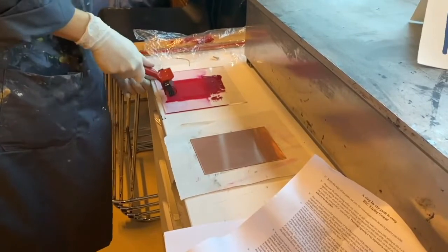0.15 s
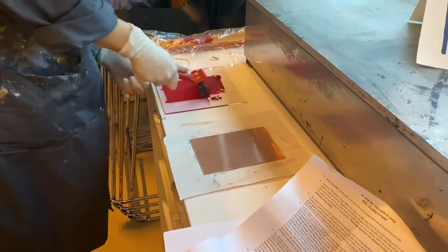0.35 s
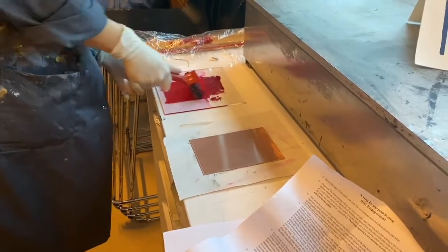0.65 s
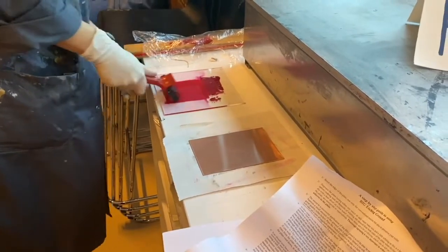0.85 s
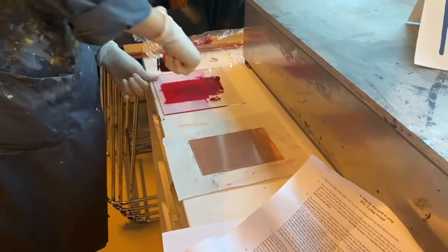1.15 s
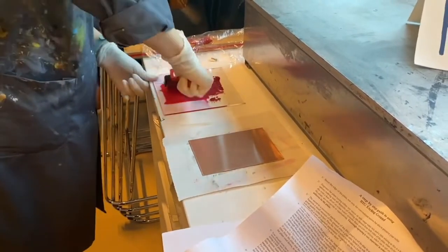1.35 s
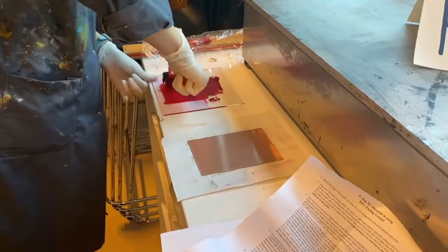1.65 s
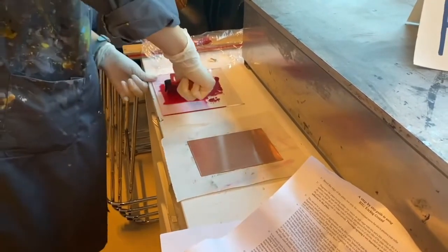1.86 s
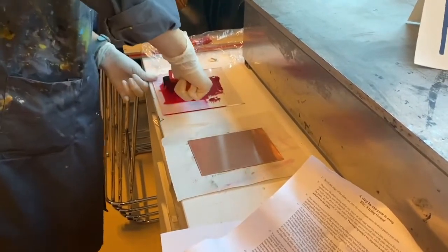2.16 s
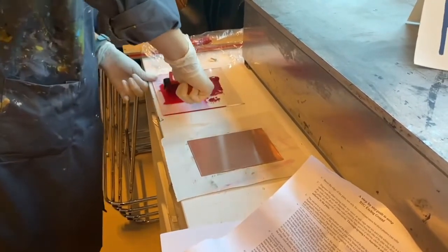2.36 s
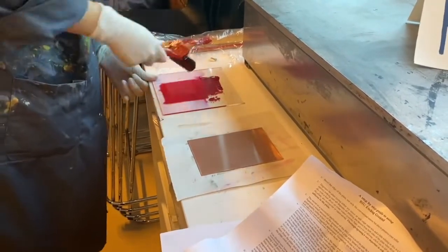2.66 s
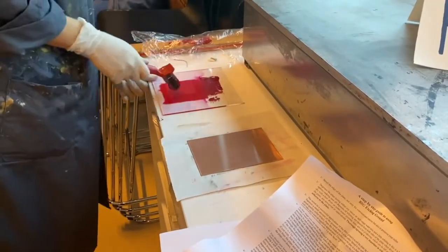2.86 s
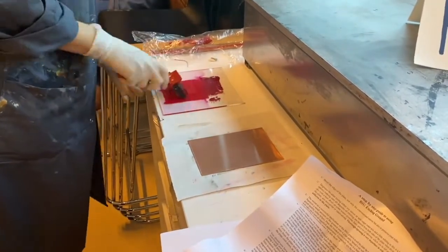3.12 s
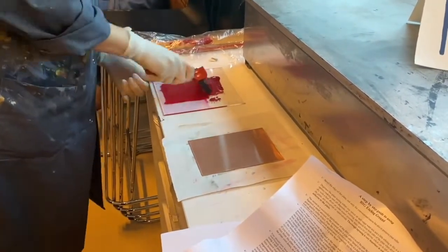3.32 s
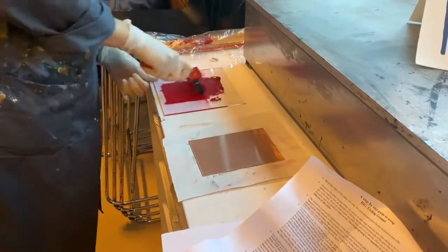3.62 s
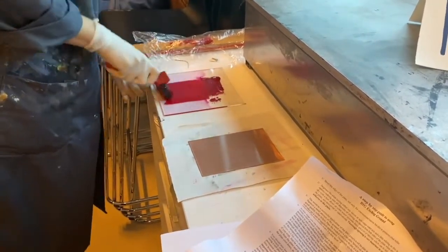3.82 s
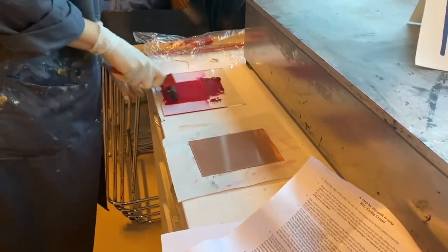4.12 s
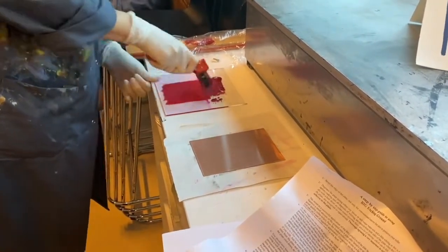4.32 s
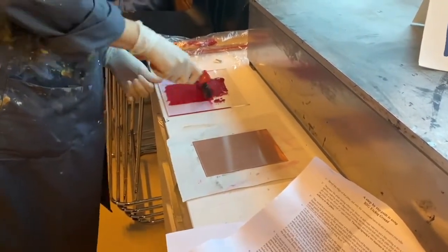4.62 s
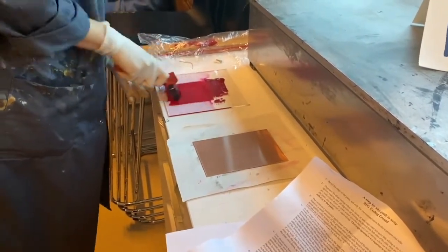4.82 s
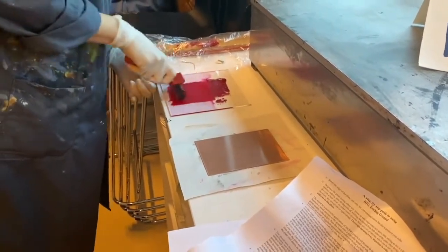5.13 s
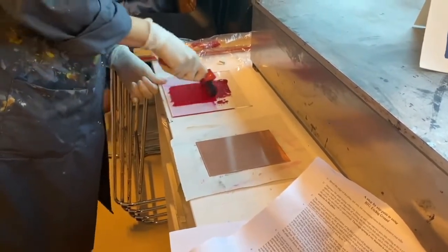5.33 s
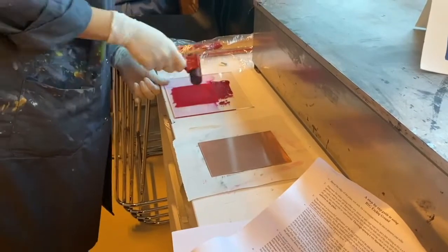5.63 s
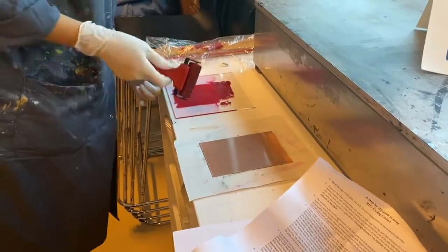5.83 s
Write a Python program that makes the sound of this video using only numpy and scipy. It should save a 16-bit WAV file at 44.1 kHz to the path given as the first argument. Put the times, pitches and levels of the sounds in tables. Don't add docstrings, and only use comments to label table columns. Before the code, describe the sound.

A small hand roller is worked on a hollow bench. Quick quiet rolling strokes come in groups, broken by a hard woody slap at about 1.3 seconds, a bright clack at 3, and a run of loud clacks from 4.1 to 5.2. Loose frame ticks and cloth rustles fill the gaps. Close two-port microphone, clipping peaks, short room echo, steady low ventilation hum.

```python
import sys
import numpy as np
from scipy import signal
from scipy.fft import rfft, irfft, next_fast_len
from scipy.io import wavfile
from scipy.ndimage import uniform_filter1d

SR = 44100
rng = np.random.default_rng(int(sys.argv[2]) if len(sys.argv) > 2 else 0)


def natural_amplitude(level_db):
    exponent = np.asarray(level_db, float) / 20
    return 10 ** exponent


def put_to_file(sound):
    columns = np.atleast_2d(sound).T
    safe = np.clip(columns, -1, 1)
    whole_steps = np.round(safe * 32767)
    wavfile.write(sys.argv[1], SR, whole_steps.astype(np.int16))


N = 263707
PAD = next_fast_len(N + 4096)

# frequency in Hz, left-right correlation.
LIKENESS = [(60, 0.87), (240, 0.95), (950, 0.046), (3770, 0.43), (15000, -0.66)]


def rms_one(x):
    return x / np.sqrt(np.mean(x ** 2) + 1e-20)


def at_hz(points, hz, axis=1):
    points = np.array(points)
    return np.interp(np.log(hz), np.log(points[:, 0]), points[:, axis])


def drift(rate):
    r = np.exp(-80 * np.pi * rate / SR)
    slow = signal.lfilter([1], [1, -2 * r, r * r], rng.standard_normal(N // 40 + 2002))[2000:]
    return np.interp(np.arange(N) / 40, np.arange(len(slow)), rms_one(slow))


def ring(force, hz, t60):
    r, w = natural_amplitude(-60 / (t60 * SR)), 2 * np.pi * hz / SR
    return signal.lfilter([0, np.sin(w)], [1, -2 * r * np.cos(w), r * r], force + 1e-18)


def fading(blows, t60, level_db=0):
    return signal.lfilter([natural_amplitude(level_db)], [1, -natural_amplitude(-60 / (t60 * SR))], blows + 1e-18)


def clicks(times, sizes):
    train = np.zeros(N)
    np.add.at(train, np.clip((times * SR).astype(int), 0, N - 1), sizes)
    return train


def coloured(x, spectrum):
    hz = np.fft.rfftfreq(PAD, 1 / SR) + 1
    return rms_one(irfft(rfft(x, PAD) * natural_amplitude(at_hz(spectrum, hz)), PAD)[..., :N])


def landings():
    thuds = [(0.242, -13.5, 9, 17, -7), (0.289, -32, -17, 11.5, 2), (1.332, 4.5, -51, -11.5, -25.5),
             (1.351, -12, -9, -3.5, -50), (2.485, -37, 8, -15, -52), (3.022, -6.5, -10, -15, -16),
             (3.038, -34, -0.5, 5, 9), (4.147, -17, -15, 6.5, -18), (4.153, -1.5, -14.5, -4, -15),
             (4.503, -5, 0.5, 5.5, -4.5), (4.552, -28.5, -6.5, 8, -0.5), (4.842, 2, -6, -10.5, -1),
             (4.865, -6, -46, -32, -37.5), (5.1651, -6, -21.5, 0.5, -14), (5.1826, -6, -23.5, -37, -45.5)]
    s, boom_db, weight_db, knock_db, hard_db = np.transpose(thuds)
    sub_db = boom_db + weight_db
    low_db = boom_db + 7 + 0.55 * weight_db
    return s, boom_db, sub_db, low_db, boom_db + knock_db, boom_db + hard_db


def bench(rumble):
    # frequency in Hz, level in dB, t60 in seconds.
    bench_modes = [(53.1, -4.5, 0.14), (83.46, -0.5, 0.25), (159.3, -3, 0.24), (111.1, -16, 0.38),
                   (208.9, -2, 0.13), (229.7, -1, 0.23), (241.8, 1, 0.23), (245.4, 3, 0.07),
                   (271.7, 2.5, 0.17), (301, -7, 0.21), (334.3, -0.5, 0.038), (383.6, -1, 0.17),
                   (422.6, 10, 0.046), (452.7, -5, 0.19), (464.5, 11, 0.029), (546.5, 3, 0.088),
                   (655, 12, 0.018), (679, 8.5, 0.074), (738, 8.5, 0.029), (824, -3, 0.11), (879, -7, 0.13),
                   (924, -4.5, 0.095), (1047, -2, 0.092), (1212, -3, 0.07), (1388, -5, 0.16)]
    # dB near 205, 300, 385 and 600 Hz.
    spots = [(7.5, -34, 3, -2), (-10, -8, 14.5, -1), (3.5, 0.5, 7, -2), (5, 0, -2, 1), (11, 2, 3, -5),
             (-13, 1.5, -1, 2), (22.5, 23.5, 10, 2), (-5.5, -10, -6.5, 12.5), (-4, 0, 5, 9.5),
             (0.5, -10.5, 0.5, 3), (-5.5, -1.5, -7.5, 10.5), (-3, 5, 6.5, 1.5), (-9, -7, -3, -1),
             (10.5, 1, -3.5, -2), (1.5, 1, -26, 4)]
    # dB near 160, 440, 550 and 1030 Hz.
    slaps = [(-1, 1, 8, -3), (-3, 3.5, -0.5, -2), (2, -1, 3, 10), (4, -6, -8.5, 0), (1, -2, 0, 0),
             (0.5, 13, -13, -0.5), (0, 6, 3, -8), (1, -6, 2, 3), (0.5, -1, 3, 2.5), (-1.5, 4.5, 2.5, 4.5),
             (1, 4.5, 1.5, 2), (1, 0.5, 0, -1), (-2, -1, 0.5, -1), (5, 3.5, 5, 6), (7.5, -1.5, 1.5, 0)]
    s, boom_db, sub_db, low_db, knock_db, rap_db = landings()
    luck = rng.normal(0, 1.7, (len(s), len(bench_modes)))
    lean_db = rng.normal(0, .8, len(bench_modes))

    hits = rng.random((4, N)) < 200 * natural_amplitude(5.5 * drift(25)) / SR
    hit_size = natural_amplitude(3.5 * np.minimum(rng.exponential(1, (4, N)), 3))
    grit = hits * hit_size * rng.choice([-1, 1], (4, N))

    spot_hz = [160, 205, 240, 300, 385, 450, 600, 800]
    slap_hz = [115, 160, 205, 390, 440, 550, 640, 900, 1030, 1200]
    force_hz = np.log([85, 160, 245, 430, 900])
    struck, rolled = 0, 0
    for k, (hz, level_db, t60) in enumerate(bench_modes):
        forces = zip(sub_db, low_db, boom_db, knock_db, rap_db)
        blow_db = np.array([np.interp(np.log(hz), force_hz, row) for row in forces])
        blow_db = blow_db + [np.interp(hz, spot_hz, [0, a, 0, b, c, 0, d, 0]) for a, b, c, d in spots]
        blow_db = blow_db + [np.interp(hz, slap_hz, [0, a, 0, 0, b, c, 0, 0, d, 0]) for a, b, c, d in slaps]
        arrival = s + 0.04094 / np.sqrt(hz) + 190 / hz ** 2 - .0014
        force = clicks(arrival, natural_amplitude(blow_db + luck[:, k] + level_db - 4) * (-1) ** k)
        swell = 900 / hz ** 2
        sides = natural_amplitude(lean_db[k] * np.array([[.5], [-.5]]))
        struck = struck + sides * ring(ring(force, hz, swell) * 14 / (swell * SR), hz, t60)
        pair = grit[[k % 4, (k + k // 7) % 4]]
        rolled = rolled + ring(pair, hz, 0.29 * t60) * natural_amplitude(level_db + 0.5 * np.log2(hz / 600))
    scrape = coloured(grit[:2], [(600, -6.5), (1200, -19.5), (2000, -10.0), (4000, -49.5)])
    rolled = rms_one(rolled) + natural_amplitude(-12.0) * scrape
    return struck + natural_amplitude(-4) * rumble * rolled


def frame():
    # start in seconds, peak in dB, centre in octaves above 2 kHz,
    # fall in dB per octave, frame ring in dB.
    clacks = [(0.2436, -13, -0.4, 1, -38.5), (1.3307, -9.5, -0.54, 24, -44), (1.3354, -18, -1.4, -0.5, -46),
              (3.017, -4, 1.03, 12.5, -16.5), (3.026, -22, 1.8, 32, -40), (3.040, -21, 1, 21, -32),
              (4.1437, -9.5, 3.3, -0.5, -2.5), (4.1517, -8, 0.65, 24, -27), (4.5017, -13.5, 0.15, 1, -46),
              (4.5064, 4, -0.46, 47, -42), (4.8414, 0.5, 0.25, 7, -18.5), (5.1616, -6, 0.7, 9.5, -12),
              (5.1663, -17, 0.38, 11, -29), (5.171, -13, 0.62, 28, -39.5)]
    ticks = [(0.077, -42, -0.5, 10, -66), (0.092, -32.5, -3.5, 0.5, -58), (0.944, -32, -1.4, 5, -68),
             (0.9500, -35.5, -0.9, 8, -65), (1.053, -45, 0.2, 19, -82), (1.064, -35, 5.5, 4, -78),
             (1.134, -45, 2, 13, -80), (2.171, -47, 0, 5, -80), (2.4777, -26.5, 0.15, 5, -62),
             (2.4862, -22.5, -7.5, -1.5, -60), (2.524, -30.5, 1.7, 10.5, -55), (2.570, -42.5, 1.6, 7, -80),
             (2.669, -42, 0, 28, -75), (2.719, -54, 3, 0, -75), (2.725, -43, -2, 7, -76),
             (2.757, -36, 3.5, 8, -80), (3.11, -18.5, 2.5, 7.5, -60), (3.462, -39, 18, 14, -58),
             (3.9045, -31.5, -1.1, 6.5, -60), (3.9853, -31, .5, 11.5, -33), (4.316, -30.5, 0.06, 19, -27),
             (4.426, -43, -0.5, 3.5, -39), (4.660, -34, -0.2, 4.5, -62), (4.668, -34, 0.4, 6, -30.5),
             (4.751, -38.5, 1.8, 6, -44.5), (5.034, -26, -1.2, 5.5, -56), (5.372, -30.5, -0.5, 6, -53.5),
             (5.3892, -34.5, 1.5, 2, -37), (5.7881, -31.5, 0.3, 17, -46), (5.949, -43.5, 0.05, 27.5, -72)]
    # frequency in Hz, level in dB, t60 in seconds.
    damped_parts = [(1320, 9, 0.0089), (2000, 18.5, 0.0043), (2500, 11.5, 0.014), (2570, 9.5, 0.024),
                    (3378, 13, 0.0048), (4230, 8.5, 0.0021), (4980, 11, 0.003), (6370, 13, 0.0014),
                    (7500, 11.5, 0.0016), (10460, 10.5, 0.0012), (12250, -6, 0.001), (15270, -4.5, .002)]
    # frequency in Hz, level in dB, t60 in seconds.
    frame_modes = [(3130, -8.5, 0.14), (3060, -2, .2), (3290, -2, .3), (3450, -2, 0.4), (3140, -3.5, .25),
                   (3430, -4.5, 0.66), (3400, -9, 0.25), (3360, -5, 0.33), (3670, -4, .13),
                   (5800, -10, .15)]
    # start in seconds, freest pitch in Hz,
    # loss in dB per 100 Hz away.
    grip = [(0, 3450, 7), (3.02, 3480, -2), (3.98, 3500, -2.5), (4.14, 3500, 2.5), (4.5, 3400, 1.5),
            (4.84, 3350, 0), (5.16, 3260, 2.5)]
    s, peak_db, centre, fall_db, ring_db = np.transpose(sorted(clacks + ticks))
    delays = rng.random((len(s), 5)) * [0, .0005, .001, .0015, .003] + [0, .0003, .0007, .001, .002]
    shares = rng.uniform(.5, 1, (len(s), 5)) * [.5, -.9, 1, -.7, .4]
    contacts = (s[:, None] + delays).ravel()
    loose = natural_amplitude(-.08 * (peak_db + 6.5))
    chatter = rng.standard_normal((2, N))
    out = 0
    for k, (hz, level_db, t60) in enumerate(damped_parts):
        octave = np.clip(np.log2(hz / 2100), -.7, 2.3)
        blow_db = peak_db - np.abs(fall_db * (octave - centre))
        sizes = natural_amplitude(blow_db + level_db - 5.0)
        burst = clicks(contacts, (sizes[:, None] * shares).ravel())
        rattle = fading(clicks(s + 0.0015, sizes * loose), .09, -37.0)
        out = out + ring(burst * (-1) ** k + rattle * chatter[k % 2], hz, min(t60, 1 / 170))

    grip_s, grip_hz, grip_loss_db = np.transpose(grip)
    free_hz, loss_db = np.interp(s, grip_s, grip_hz), np.interp(s, grip_s, grip_loss_db)
    for k, (hz, mode_db, t60) in enumerate(frame_modes):
        level_db = mode_db + 3.5 - loss_db * np.minimum(np.abs(hz - free_hz), 400) / 100
        shaken = fading(clicks(s, natural_amplitude(ring_db + level_db)), .85 * t60, -49)
        clean = ring(clicks(s, natural_amplitude(ring_db + level_db - 23.5)), hz, t60)
        out = out + ring(shaken * chatter[k % 2], hz, 0.032) + clean
    return out * natural_amplitude(np.array([[.2], [-.2]]))


def jolts():
    # start in seconds, peak in dB, centre in octaves above 240 Hz, fall in dB per octave.
    knocks = [(0.076, -27.5, 1.03, 7), (0.23, -25.5, 2.2, 3), (0.683, -51, 1.5, 6), (0.776, -56, 1.2, 14),
              (1.32, -34, 2.4, 6), (1.641, -31, 0.8, 10), (2.084, -39.5, 0.36, 8), (2.41, -54, 2.4, 17),
              (3.13, -28.5, 0.67, 13), (3.59, -34, 1.5, 26), (3.64, -27.5, 2.4, 22.5),
              (3.79, -30.5, 2.4, 19.5), (4.606, -23.5, 1.7, 9), (4.648, -18.5, 2.4, 10),
              (4.691, -25, 2.9, 8), (4.712, -33.5, 1.4, 11), (5.391, -31, 4.1, 15.5),
              (0.096, -34.5, 0.26, 2), (0.604, -35, 1.8, 9.5), (0.949, -24, 1.1, 4.5),
              (1.864, -42.5, 2.2, 2), (1.967, -29.5, 0.58, 19), (2.04, -33.5, 1.42, 16),
              (2.174, -38, 1.5, 3), (2.321, -39.5, 1, 6.5), (2.478, -29.5, 3.1, 2), (2.486, -26.5, 3, -3),
              (2.236, -38, .8, 23), (2.72, -41.5, 2.4, 25), (3.336, -26, 1.5, 20.5), (3.353, -36, 0.73, 18),
              (3.389, -27.5, 1.5, 15.5), (3.464, -23.5, 2.3, 7), (3.485, -27, 2.2, 0.5),
              (3.499, -32.5, .05, 15), (2.389, -39, .8, 19), (3.561, -32, 1.5, 15.5),
              (3.625, -25.5, 1.5, 11), (3.652, -39, .3, -2), (3.797, -38, .05, -8), (3.825, -28, 1.3, 13),
              (3.906, -23, 1, 12.5), (4.317, -26.5, .05, 3), (4.658, -19, 1.9, 12), (5.374, -17, 2.12, 17),
              (5.786, -47, 2.2, 24.5), (5.949, -36.5, 2.1, 12)]
    # frequency in Hz, level in dB, t60 in seconds.
    roller_modes = [
        [(231.8, 0, 0.23), (234, 10, 0.032)],
        [(430.4, 8, 0.028), (446.5, 3.5, 0.065)],
        [(643, 3, 0.044), (694, 8, 0.015), (770, 1, 0.022)],
        [(984, -2, 0.02), (1230, -6, 0.019), (1430, -13, 0.04)],
    ]
    s, peak_db, centre, fall_db = np.transpose(knocks)
    delays = rng.random((len(s), 5)) * .016 * [0, 1, 1, 1, 1]
    contacts = (s[:, None] + delays).ravel()
    out = 0
    for octave, modes in zip([0, .8, 1.5, 2.4], roller_modes):
        for k, (hz, level_db, t60) in enumerate(modes):
            sizes = natural_amplitude(peak_db - np.abs(fall_db * (octave - centre)) + level_db + 1.5) * (-1) ** k
            shares = np.c_[np.ones(len(s)), natural_amplitude(-16) * rng.standard_normal((len(s), 4))]
            out = out + ring(clicks(contacts, (sizes[:, None] * shares).ravel()), hz, 0.79 * t60)
    return signal.sosfilt(signal.butter(2, 2200, fs=SR, output="sos"), out)


def shudder():
    # frequency in Hz, level in dB per Hz.
    loose_things = [(120, -5), (230, -0.5), (450, -15.5), (900, -8), (1400, -25), (2200, -31.5),
                    (4000, -34.5), (8000, -56.5)]
    s, boom_db, sub_db, low_db, knock_db, rap_db = landings()
    blows = clicks(s + 0.0015, natural_amplitude(knock_db) + natural_amplitude(rap_db + 8.0) + natural_amplitude(boom_db - 30.0))
    envelope = fading(blows, .15, -16.5) + fading(blows, .7, -24.5)
    shared, *own = rng.standard_normal((3, N))
    return uniform_filter1d(envelope, size=300) * coloured(shared + 2.6 * np.array(own), loose_things)


def strokes():
    # start in seconds, length in seconds, ink hiss in dB, rumble in dB.
    turns = [(-.1, 0.2, -53.5, -35.5), (0.258, 0.18, -44.5, -40), (0.421, 0.19, -49.5, -37.5),
             (0.601, 0.18, -48.5, -38), (0.759, 0.2, -50, -37), (1.343, 0.19, -49.5, -36.5),
             (1.515, 0.19, -44.5, -39.5), (1.694, 0.16, -54, -40.5), (1.846, 0.19, -46, -43),
             (2.027, 0.15, -57.5, -52.5), (2.157, 0.16, -47.5, -47), (2.307, 0.25, -55, -42.5),
             (3.015, 0.24, -56, -43.5), (3.18, 0.28, -53, -37), (3.404, 0.17, -49, -33),
             (3.555, 0.17, -49.5, -32.5), (3.701, 0.25, -51.5, -35), (4.131, 0.2, -43.5, -31.5),
             (4.493, 0.19, -45.5, -39), (4.723, 0.1, -63, -43.5), (4.818, 0.26, -48, -30),
             (5.186, 0.24, -48.5, -34.5)]
    t = np.arange(N) / SR
    bright, dull, rumble = np.zeros((3, N))
    for start, length, hiss_db, rumble_db in turns:
        speed = np.sin(np.pi * np.clip((t - start) / length, 0, 1)) ** 2 + 1e-12
        bright = bright + natural_amplitude(hiss_db) * speed ** (1.3 / 2)
        dull = dull + (natural_amplitude(hiss_db - 19.5) + natural_amplitude(rumble_db - 17)) * speed ** (1.2 / 2)
        lumps = natural_amplitude(-0.5) * speed ** (13 / 2)
        rumble = rumble + natural_amplitude(rumble_db - 3.5) * (speed ** (0.35 / 2) + lumps)
    s, boom_db, sub_db, low_db, knock_db, rap_db = landings()
    settle = fading(clicks(s, natural_amplitude(knock_db)), 0.47)
    return bright, dull + natural_amplitude(-50) * settle, rumble + natural_amplitude(-18.5) * settle


def ink(bright, dull):
    # frequency in Hz, level in dB per Hz.
    bright_hiss = [(8300, -24), (9200, -10), (10600, -10), (12000, -15.5), (13300, -43), (14300, -19.5),
                   (15700, -18), (16000, -83)]
    # frequency in Hz, level in dB per Hz.
    dull_hiss = [(1000, -18), (1800, -10.5), (3500, -8), (4500, -11), (6800, -9.5), (7900, -3.5),
                 (9000, -88)]
    breaks = rng.random((3, N)) < 9000 * natural_amplitude(2.5 * drift(40)) / SR
    snaps = breaks * natural_amplitude(0.69 * rng.exponential(1, (3, N))) * rng.choice([-1, 1], (3, N))
    wide = np.sqrt(1 - .6) * snaps[1:] + np.sqrt(.6) * snaps[0]
    return bright * natural_amplitude(1.5) * coloured(wide, bright_hiss) + dull * natural_amplitude(-1.5) * coloured(wide, dull_hiss)


def rustle():
    # start in seconds, length in seconds, level in dB.
    moves = [(0.073, 0.13, -89), (0.95, 0.41, -60), (2.45, 0.44, -62), (3.992, 0.39, -57),
             (4.33, 0.23, -53), (5.423, 0.43, -52.5), (5.863, 0.54, -56.5)]
    # frequency in Hz, level in dB per Hz.
    cloth = [(300, -40.5), (700, 1), (1200, 1.5), (2500, -6), (5000, -8), (8000, -15), (11800, -13.5),
             (13200, -54)]
    t, gain = np.arange(N) / SR, 0
    for start, length, level_db in moves:
        swell = np.sin(np.pi * np.clip((t - start) / length, 0, 1))
        gain = gain + natural_amplitude(level_db) * np.sqrt(np.abs(swell))
    shared, *own = rng.standard_normal((3, N))
    return gain * natural_amplitude(2.0 * drift(60)) * coloured(shared + 1.3 * np.array(own), cloth)


def ports(x):
    # frequency in Hz, radians the left leads.
    left_phase = [(0, 0), (200, -0.01), (450, -1.5), (690, -1.94), (1000, -1.5), (1380, -1.5), (2410, -4.5),
                  (5430, -5.5), (10500, -12.5), (16600, -18)]
    # frequency in Hz, left over right in dB.
    left_lean = [(60, 4), (130, -0.8), (250, 1.6), (500, 2), (1000, 0.65), (2200, 3.5), (5000, 2.2),
                 (12000, 1.1)]
    hz = np.fft.rfftfreq(PAD, 1 / SR)
    left = np.exp(1j * np.interp(hz, *np.transpose(left_phase))) * natural_amplitude(at_hz(left_lean, hz + 1))
    return np.array([irfft(rfft(x[0], PAD) * left, PAD)[:N], x[1]]) * natural_amplitude(-0.48)


def workshop(x):
    # frequency in Hz, t60 in seconds, level in dB.
    room = [(59, 1, -7), (261, 0.25, -6.5), (960, 0.48, -7.5), (3100, 1, -5.5), (8470, 0.2, -6.5),
            (16000, .2, -25)]
    t, tail = np.arange(SR) / SR, 0
    shared, *own = rng.standard_normal((3, SR))
    for hz in 45 * 2. ** np.arange(9):
        alike = np.clip(at_hz(LIKENESS, hz), 0, 1)
        edges = [hz / np.sqrt(2), min(hz * np.sqrt(2), 16000)]
        band = signal.butter(2, edges, "band", fs=SR, output="sos")
        t60 = min(at_hz(room, hz), .33 + 300 / hz)
        fade = natural_amplitude(at_hz(room, hz, axis=2) - 60 * t / t60)
        fade = fade * np.minimum(t / 0.0025, 1) / np.sqrt(t60 * SR / 14)
        noise = np.sqrt(alike) * shared + np.sqrt(1 - alike) * np.array(own)
        tail = tail + fade * signal.sosfilt(band, noise)
    return signal.fftconvolve(x[None], tail, axes=1)[:, :N]


def hum():
    # frequency in Hz, level in dB per Hz.
    air = [(15, -38), (25, 2.5), (71, 5.5), (102, -2.5), (171, -3), (246, -10), (311, -10), (355, -25),
           (1240, -41), (1480, -29.5), (2990, -34.5), (3500, -34), (5580, -35.5), (10200, -35.5),
           (12000, -48), (12700, -63), (16000, -100), (22000, -120)]
    # frequency in Hz, width in Hz, level in dB.
    motors = [
        (165.44, 13, -49),
        (214, 2.8, -56.5),
        (91, 25, -57.5),
        (57.5, 20, -57),
    ]
    hz = np.fft.rfftfreq(PAD, 1 / SR) + 1
    mid, side = rfft(rng.standard_normal((2, PAD)))
    alike = np.clip(at_hz(LIKENESS, hz), -1, 1)
    pair = irfft(np.sqrt(1 + alike) * mid + np.sqrt(1 - alike) * side * [[1], [-1]], PAD)[:, :N]
    fan, *others = (natural_amplitude(level_db) * rms_one(ring(pair, line_hz, 7.3 / width))
                    for line_hz, width, level_db in motors)
    run_down_db = np.clip(30 * (np.arange(N) / SR - 5.3), 0, 8)
    lines = sum(others) + fan * natural_amplitude(-run_down_db)
    return natural_amplitude(-43.5 + 0.41 * drift(3.2)) * coloured(pair, air) + lines


def scene():
    bright, dull, rumble = strokes()
    body = bench(rumble) + shudder() + jolts()
    metal = frame()
    surface = ink(bright, dull) + rustle()
    into_room = (body + natural_amplitude(-0.5) * metal + surface).mean(axis=0)
    return ports(body + metal + surface) + workshop(into_room) + hum()


def band_limit(x):
    return signal.sosfilt(signal.butter(12, 17090, fs=SR, output="sos"), x)


def record(dry):
    knee_top, knee_power = 1.63, 2.67
    t = np.arange(N) / SR
    dry = signal.sosfilt(signal.butter(2, 42, "high", fs=SR, output="sos"), dry)
    over_db = np.clip(20 * np.log10(np.abs(dry).max(axis=0) + 1e-9) + 2, 0, 5)
    held_db = np.maximum.accumulate(over_db + 25 * t) - 25 * t
    late_db = uniform_filter1d(np.interp(t - .042, t, held_db), size=400)
    ducked = dry * natural_amplitude(-late_db)
    rounded = ducked / (1 + np.abs(ducked / knee_top) ** knee_power) ** (1 / knee_power)
    clipped = np.clip(rounded, -1, 1)
    clipped = signal.sosfilt(signal.cheby2(8, 40, 16900, fs=SR, output="sos"), clipped)
    clipped = signal.sosfilt(signal.butter(3, 44, "high", fs=SR, output="sos"), clipped)
    return band_limit(clipped)


dry = scene()
out = record(dry)
put_to_file(out)
```